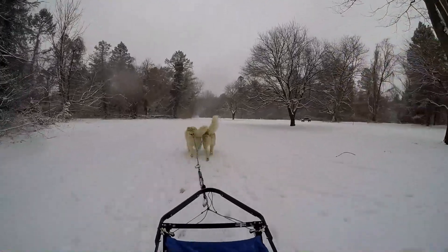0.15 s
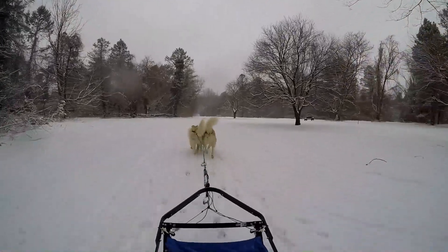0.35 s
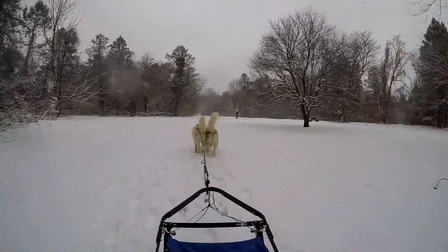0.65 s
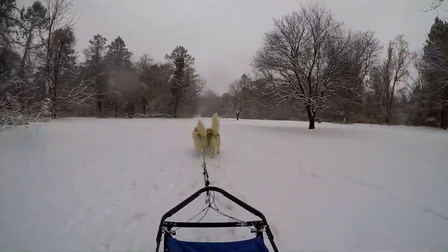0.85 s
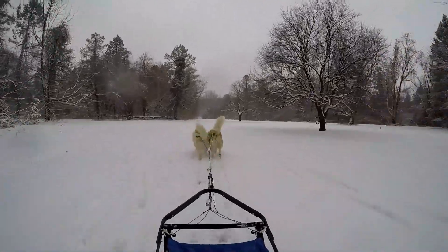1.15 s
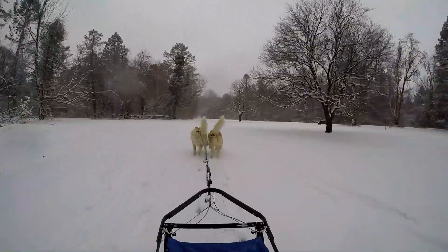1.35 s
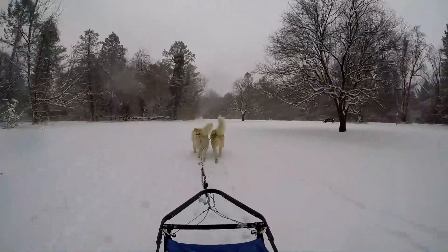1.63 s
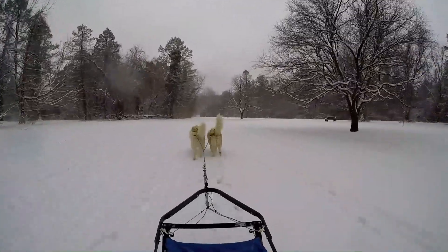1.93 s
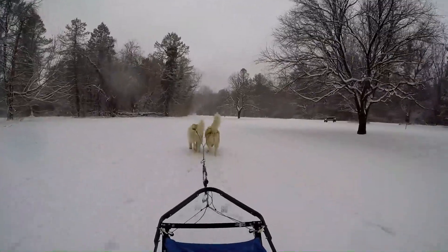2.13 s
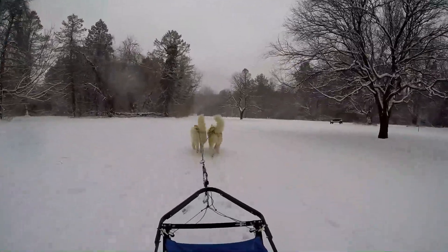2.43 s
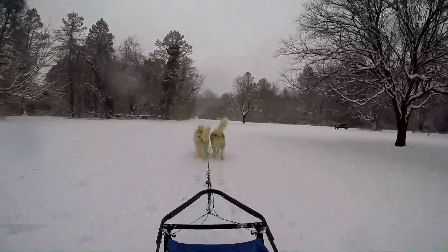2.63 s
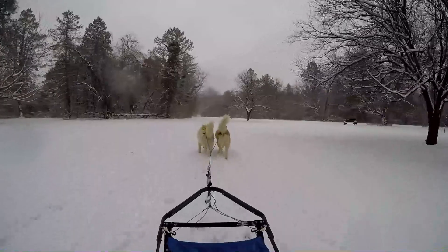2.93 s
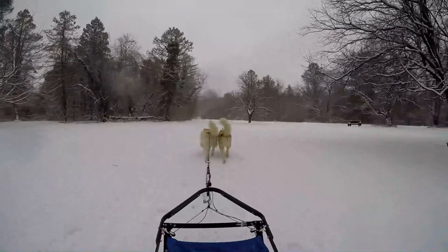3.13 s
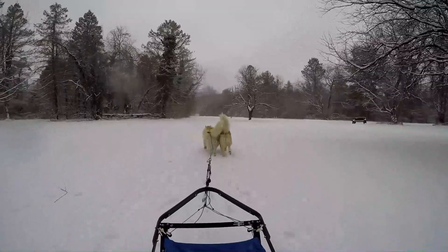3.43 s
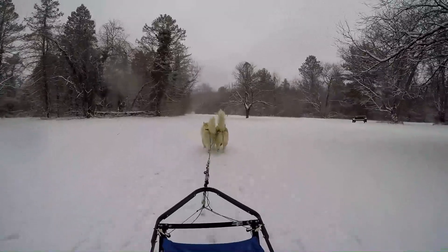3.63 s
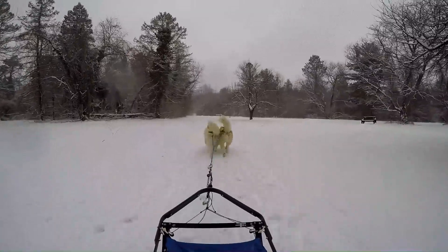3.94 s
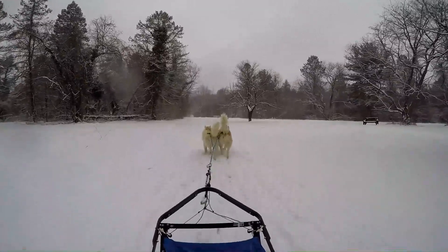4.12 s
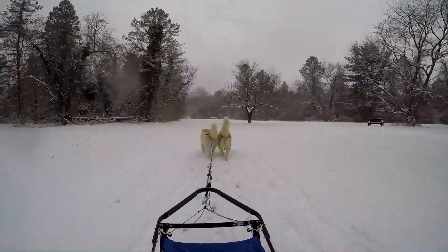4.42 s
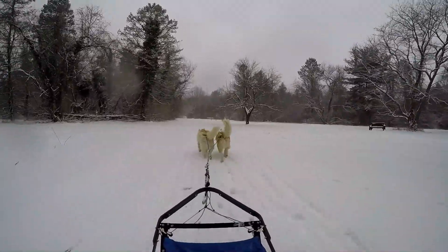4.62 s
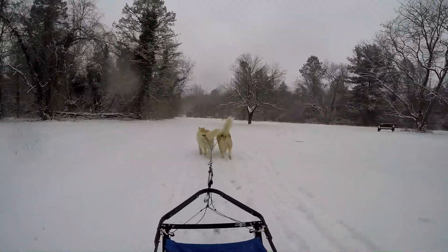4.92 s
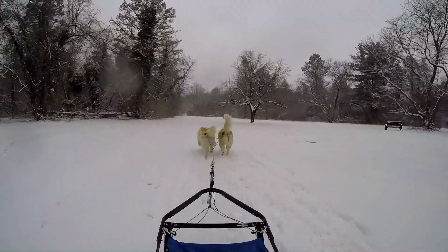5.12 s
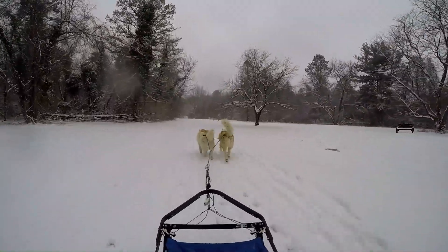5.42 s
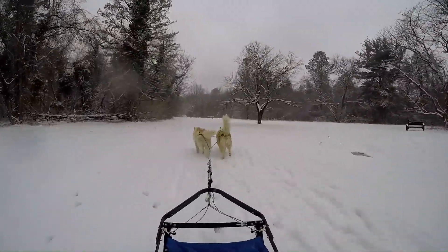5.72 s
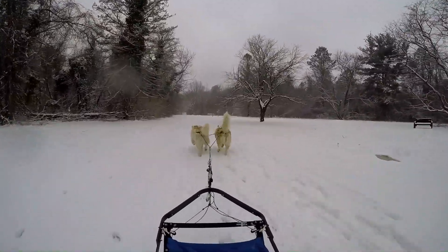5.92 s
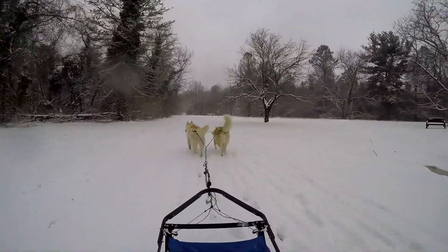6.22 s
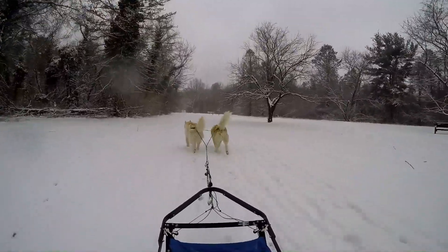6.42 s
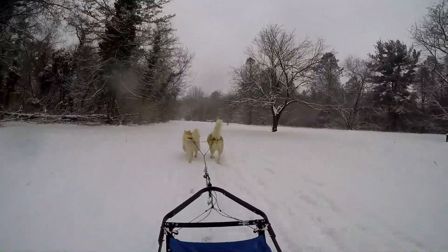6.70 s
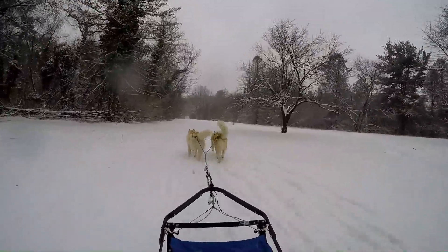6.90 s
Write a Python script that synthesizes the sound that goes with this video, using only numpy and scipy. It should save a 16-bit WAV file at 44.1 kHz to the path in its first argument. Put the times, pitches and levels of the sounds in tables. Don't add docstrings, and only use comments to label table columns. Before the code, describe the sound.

Close, muffled sled ride: droning frame, irregular dull knocks, plastic rattles in bursts, sharp little ticks and crunching snow under the runners.

```python
import sys
import numpy as np
from scipy import signal
from scipy.io import wavfile
from scipy.ndimage import uniform_filter1d

SR = 44100
rng = np.random.default_rng(int(sys.argv[2]) if len(sys.argv) > 2 else 0)


def master(y):
    cut = np.clip(np.atleast_2d(y).T, -1, 1)
    pcm = np.round(cut * 32767)
    wavfile.write(sys.argv[1], SR, pcm.astype(np.int16))


def ratio_of_db(decibels):
    return 10 ** (np.asarray(decibels, float) / 20)


N = 311346

# f/Hz, width/Hz, level/dB
FRAME = [(451.5, 76, -2), (489.7, 73.7, -2.5), (539.5, 58.6, -1), (662.4, 53.6, -8)]
# f/Hz, width/Hz, level/dB
FRAME_UPPER = [(763.5, 18.3, -3), (869, 59, -4.5), (1053, 810, -13)]
GLIDE_CRUNCH_DB, GLIDE_WEIGHT_DB = -53.5, -45


def evened(x):
    return x / np.sqrt(np.mean(x ** 2) + 1e-20)


def curve(table, column):
    rows = np.array(table)
    return ratio_of_db(np.interp(np.arange(N) / SR, rows[:, 0], rows[:, column]))


def resonate(x, hz, width):
    pole = np.exp((2j * np.pi * hz - np.pi * width) / SR)
    gain = (1 - abs(pole)) ** 2
    return 2 * signal.lfilter([gain], np.poly([pole, pole]), x).real


def body(x, modes, widen=1.645):
    total = 0
    for k, (hz, width, db) in enumerate(modes):
        total = total + (-1) ** k * ratio_of_db(db) * resonate(x, hz, widen * width)
    return total


def grit(per_s, spread_db, smooth):
    size = ratio_of_db(spread_db * np.minimum(rng.exponential(1, N), 4)) * rng.choice([-1, 1], N)
    bumps = evened(size * (rng.random(N) < per_s / SR))
    return evened(bumps + smooth * rng.standard_normal(N))


def strikes(times, peak_db, ring):
    train = np.zeros(N)
    at = np.clip(np.round(times * SR).astype(int), 0, N - 1)
    np.add.at(train, at, ratio_of_db(peak_db) * rng.choice([-1, 1], len(at)))
    return signal.oaconvolve(train, ring / abs(ring).max())[:N]


def crust(column, glide_db):
    # start t/s, length/s, crunch level/dB, weight on the frame level/dB
    patches = [(0.005, .07, -41.5, -36.5), (0.162, 0.085, -45.5, -37.5), (0.355, 0.063, -44.5, -33),
               (0.69, 0.15, -47.5, -40.5), (0.841, .21, -44, -34.5), (1.201, 0.21, -46, -33),
               (1.457, 0.15, -50, -42.5), (1.688, 0.12, -47.5, -33), (2.017, 0.041, -47, -35),
               (2.145, 0.14, -50, -35), (2.486, 0.17, -44, -37.5), (2.851, 0.19, -43.5, -38.5),
               (3.059, 0.067, -54, -39), (3.17, 0.085, -39.5, -35), (3.533, 0.1, -46, -41.5),
               (3.746, 0.19, -41.5, -33), (3.983, 0.12, -46.5, -39.5), (4.137, 0.12, -40, -34.5),
               (4.31, 0.12, -45, -34), (4.483, 0.081, -39.5, -34), (4.648, 0.05, -35, -37),
               (4.765, 0.057, -50.5, -36.5), (4.891, 0.21, -51, -36.5), (5.26, .13, -41.5, -39.5),
               (5.423, 0.069, -38.5, -35), (5.592, .19, -45, -37.5), (5.845, 0.17, -50.5, -41.5),
               (6.197, 0.222, -51, -40), (6.53, 0.17, -50, -42), (6.7, 0.18, -41.5, -41.5)]
    bite_s, let_go_s = 0.0058, 0.0084
    t = np.arange(N) / SR
    power = np.full(N, ratio_of_db(glide_db) ** 2)
    for row in patches:
        start = round(row[0] * SR)
        stop = round((row[0] + row[1] + 8 * let_go_s) * SR)
        since = t[start:stop] - row[0]
        attack = np.clip(since / bite_s, 0, 1)
        release = np.exp(-np.maximum(since - row[1] + let_go_s / 2, 0) / let_go_s)
        power[start:stop] += (ratio_of_db(row[column]) * attack * release) ** 2
    return np.sqrt(power)


def runners():
    # f/Hz, width/Hz, level/dB
    sway_modes = [(28.7, 9.6, -4.5), (44.4, 60, -27)]
    # f/Hz, width/Hz, level/dB
    flex_modes = [(85.2, 27.3, -9), (132.8, 23, 3.5), (139.6, 43, -1.5)]
    # t/s, level/dB
    swing = [(0.0, -34), (0.08, -36), (0.25, -41.5), (0.33, -40.5), (1.55, -35.5), (1.99, -42),
             (2.62, -36.5), (3.26, -41), (4.5, -39.5), (4.95, -47), (4.99, -37.5), (7.06, -41)]
    sway = evened(body(rng.standard_normal(N), sway_modes))
    sway = evened(np.tanh(0.54 * sway))
    bumps = grit(per_s=250, spread_db=4.0, smooth=0.6)
    weight = crust(column=3, glide_db=GLIDE_WEIGHT_DB)
    flex = ratio_of_db(-38.5) * evened(weight) ** 1.15 * evened(body(bumps, flex_modes))
    drone = evened(body(bumps, FRAME) + ratio_of_db(-17.0) * body(bumps, FRAME_UPPER))
    return ratio_of_db(2.6) * curve(swing, column=1) * sway + flex + ratio_of_db(3.0) * weight * drone


def snow():
    # f/Hz, level per Hz/dB
    hiss = [(35, -44), (60, 9), (139, 3), (262, -10), (527, -4.5), (666, -23.5), (822, -15), (1510, -24.5),
            (1820, -19), (2770, -49), (3580, -23), (15300, -37.5), (16000, -60)]
    # t/s, hiss level/dB
    press = [
        (0.0, -64.5),
        (1.2, -66.5),
        (1.36, -67),
        (2.85, -65),
        (3.87, -68),
        (4.19, -67),
        (4.66, -70),
        (5.23, -65),
        (6.59, -67),
        (7.06, -64),
    ]
    frames, hz = N // 128 + 5, np.fft.rfftfreq(512, 1 / SR)
    a, b, drift = rng.standard_normal((frames, 257, 3)).T
    drift = uniform_filter1d(drift, 6, 0)
    drift = evened(uniform_filter1d(drift, 20, 1))
    f, db = np.transpose(hiss)
    colour_db = np.interp(np.log(hz + 1), np.log(f + 1), db)
    spectrum = (a + 1j * b) * ratio_of_db(colour_db[:, None] + 1.32 * drift)
    noise = signal.istft(spectrum, nperseg=512, noverlap=384)[1][:N]
    return ratio_of_db(-45.5) * evened(noise) * evened(curve(press, column=1)) ** 0.9


def clamp():
    # t/s, peak level/dB
    taps = [(0.0373, -61), (0.102, -22.5), (0.492, -32), (0.8996, -21), (0.9306, -28), (1.2213, -25),
            (1.3024, -20), (2.3622, -28.5), (3.5423, -34), (3.648, -27), (3.7753, -29), (3.8697, -30),
            (4.0732, -18), (4.143, -32), (4.223, -21.5), (4.3166, -37), (4.7675, -24), (4.9155, -24),
            (5.3566, -24), (5.9727, -23.5), (6.5187, -30), (6.5864, -29), (6.765, -52), (6.8025, -24),
            (6.8507, -25.5), (6.8866, -32.5)]
    # t/s, peak level/dB, high tones over it/dB
    rattles = [(0.1677, -24.5, -11.5), (0.3708, -24.5, -4), (0.7073, -33, -17), (0.8824, -19.5, -9.5),
               (1.2102, -22.5, -7), (1.3057, -23.5, -18), (1.4814, -25.5, -12), (1.5545, -18, -5.5),
               (1.698, -24.5, -15), (1.7774, -25, -10), (2.168, -29.5, -1), (2.2533, -21.5, -16),
               (2.3615, -33, -5), (2.9886, -24, -3), (3.1817, -24.5, -9), (3.22, -23, -20),
               (3.3947, -30, -13), (3.8566, -25, -15), (4.0187, -23.5, -56), (4.0492, -18, -17),
               (4.1449, -22, -3), (4.3264, -26, -4), (4.9872, -21, -4.5), (5.1257, -23.5, -6),
               (5.3567, -45, -46), (5.434, -21, -14), (5.6036, -25, -46), (6.2057, -26.5, -6),
               (6.5859, -20, -40), (6.982, -35.5, -4.5)]
    # f/Hz, width/Hz, level/dB
    low_modes = [(1310, 1800, -7), (1492, 213, 20.5)]
    # f/Hz, width/Hz, level/dB
    mid_modes = [(2408, 244, 0.5), (2588, 27, -2), (2722, 128, 0.5), (3253, 186, -7.5)]
    # f/Hz, width/Hz, level/dB
    high_modes = [(4040, 500, 13.5), (4547, 136, 19.5), (5016, 350, 20), (6360, 1160, 2)]
    bounce_s = 0.018
    s, db, high_db = np.transpose(rattles)
    tap_s, tap_db = np.transpose(taps)
    t = np.arange(4096) / SR
    bounces = ratio_of_db(-60 * (t % bounce_s) / 0.022) + ratio_of_db(-15.5)
    scrape = ratio_of_db(-60 * t / 0.12) * bounces
    crumble = rng.standard_normal(512) * ratio_of_db(-60 * np.arange(512) / SR / 0.0052)
    shared = evened(signal.oaconvolve(grit(per_s=400, spread_db=4.0, smooth=0.038), crumble)[:N])
    crunch = crust(column=2, glide_db=GLIDE_CRUNCH_DB)
    heavy = crunch * evened(crust(column=3, glide_db=GLIDE_WEIGHT_DB)) ** 0.25
    speed = 1 + 0.5 * evened(uniform_filter1d(rng.standard_normal(N), size=1500))
    turns = np.cumsum(speed) / SR / bounce_s
    slips = evened(ratio_of_db(-24 * (turns % 1)))
    groups = ((low_modes, tap_s, tap_db - 0.5, ratio_of_db(-7.5) * heavy),
              (mid_modes, s, db - 0.5, ratio_of_db(-2.5) * crunch),
              (high_modes, s, db + high_db - 1.0, ratio_of_db(-11.0) * crunch))
    out = np.zeros(N)
    for modes, at, hit_db, chatter in groups:
        grains = evened(shared + 0.44 * grit(per_s=500, spread_db=7.0, smooth=0.08))
        click = signal.unit_impulse(2048)
        rings = [body(click, [mode], widen=1.72) * (-1) ** k for k, mode in enumerate(modes)]
        ring = sum(rings)
        scraping = abs(strikes(at, hit_db, scrape)) * grit(per_s=830, spread_db=4.5, smooth=0.22)
        force = chatter * slips * grains + ratio_of_db(-5) * scraping
        for one in rings:
            favour = np.repeat(rng.uniform(-1.1, 1, N // 256 + 1), 256)[:N]
            place = evened(ratio_of_db(4.5 * favour))
            out += signal.oaconvolve(force * place, one / np.linalg.norm(ring))[:N]
        out += strikes(at, hit_db - 19.0, ring)
    return out


def knocks():
    # t/s, peak level/dB, pitch f/Hz, hardness level/dB
    jolts = [(0.163, -22, 495, -28), (0.364, -29, 500, -23), (0.797, -21, 582, -29),
             (0.897, -17.5, 508, -27), (0.972, -20.5, 600, -27), (1.213, -26, 553, -24),
             (1.299, -19.5, 610, -29), (1.717, -21.5, 516, -40), (1.775, -39, 560, -14),
             (2.134, -24.5, 574, -25), (2.165, -17.5, 528, -25), (2.251, -19.5, 630, -35),
             (2.911, -20, 586, -28), (3.008, -21.5, 534, -56), (3.102, -21.5, 530, -33),
             (3.172, -27, 506, -19), (3.3, -18, 507, -38), (3.755, -29, 534, -30), (3.795, -19, 510, -30),
             (3.837, -20, 475, -27), (4.315, -18, 566, -20), (4.406, -20.5, 545, -22),
             (4.523, -19.5, 550, -18.5), (4.768, -23, 575, -32), (4.798, -22.5, 514, -37),
             (4.973, -19.5, 532, -26), (5.436, -18.5, 520, -19), (5.743, -24, 503, -32),
             (6.606, -18, 530, -25), (6.844, -21, 553, -27)]
    out, t = np.zeros(N + 4096), np.arange(4096) / SR
    push = np.exp(-((t - 0.0015) / 0.00029) ** 2)
    upper = body(push, FRAME_UPPER, widen=2.0)
    upper = upper / abs(upper).max()
    for s, db, hz, upper_db in jolts:
        near = [(f, w, d - 5.5 * abs(f - hz) / 100) for f, w, d in FRAME]
        ring = body(push, near + [(hz, 70, 3)], widen=1.92)
        ring = ring / abs(ring).max() + ratio_of_db(upper_db + 12.5) * upper
        out[round(s * SR):][:4096] += ratio_of_db(db + 2.0) * ring
    return out[:N]


def latch():
    # t/s, peak level of the bright snap/dB
    ticks = [(0.8836, -42), (0.968, -50), (1.2187, -42.5), (1.3058, -33), (1.3424, -53), (1.3643, -52),
             (1.392, -46), (1.5075, -37), (1.5891, -40), (1.7826, -38), (1.8128, -51), (2.1708, -41.5),
             (2.1996, -34.5), (2.611, -33), (2.638, -34), (2.6922, -40), (2.986, -41.5), (3.004, -45),
             (3.7897, -41.5), (3.859, -36), (4.1897, -40), (4.5084, -40), (4.982, -35.5), (5.4462, -42.5),
             (5.7968, -49.5)]
    # t/s, peak level of the snap/dB
    chips = [(2.9642, -46), (3.129, -49), (3.1797, -47.5), (4.5377, -83), (4.6104, -52), (4.757, -52),
             (4.8272, -45), (4.8818, -54), (5.1344, -50), (5.1823, -52), (5.846, -46.5), (5.891, -56),
             (6.199, -48), (6.2104, -45), (6.5605, -52), (6.722, -51), (6.7695, -55), (6.935, -42.5)]
    s, db = np.transpose(np.concatenate([ticks, chips]))
    is_tick = np.arange(len(s)) < len(ticks)
    ring_db = np.where(is_tick, 10, 6)
    edge_db = np.where(is_tick, -5, -6)
    t = np.arange(512) / SR
    snap = np.sin(2 * np.pi * 9260 * t) * ratio_of_db(-60 * t / 0.0012) * (1 - np.exp(-t / 0.0001))
    ring = np.sin(2 * np.pi * 4150 * t) * ratio_of_db(-60 * t / 0.0064) * (1 - np.exp(-t / 0.0001))
    edge = np.sin(2 * np.pi * 12500 * t) * ratio_of_db(-60 * t / 0.00043)
    fleck = np.sin(2 * np.pi * 11900 * t) * ratio_of_db(-60 * t / 0.001) * (1 - np.exp(-t / 0.000058))
    hits = strikes(s, db + 10.0, snap) + strikes(s, db + ring_db, ring) + strikes(s, db + edge_db + 16.0, edge)
    breaking = evened(crust(column=2, glide_db=GLIDE_CRUNCH_DB)) ** 0.35
    tiny = breaking * grit(per_s=130, spread_db=5.0, smooth=0.056)
    crackle = evened(signal.oaconvolve(tiny, 0.25 * snap + fleck)[:N])
    return hits + ratio_of_db(-70.5) * crackle


def scene():
    return (runners() + snow() + clamp() + knocks() + latch())[None]


def band_limit(x):
    return signal.sosfilt(signal.butter(12, 16510, fs=SR, output="sos"), x)


def record(dry):
    step = signal.firwin2(801, [0, 15250, 15450, SR / 2], [1, 1, ratio_of_db(-17), ratio_of_db(-45)], fs=SR)
    mix = signal.oaconvolve(dry, step[None], "same")
    return band_limit(mix)


dry = scene()
out = record(dry)
master(out)
```